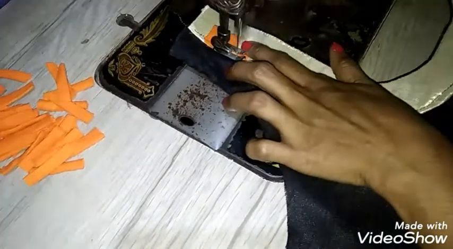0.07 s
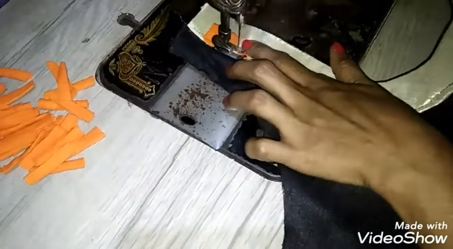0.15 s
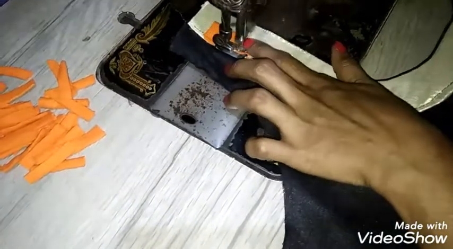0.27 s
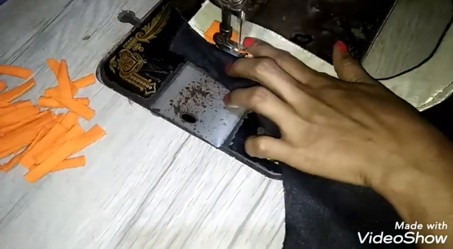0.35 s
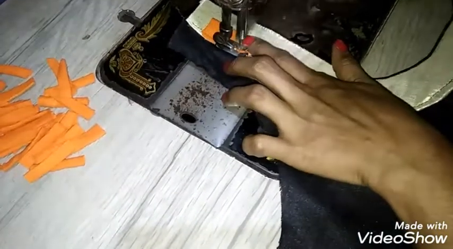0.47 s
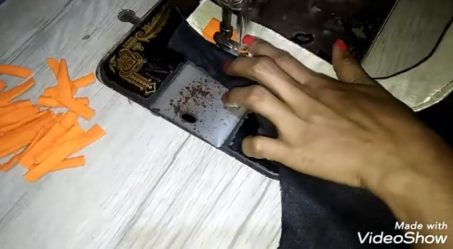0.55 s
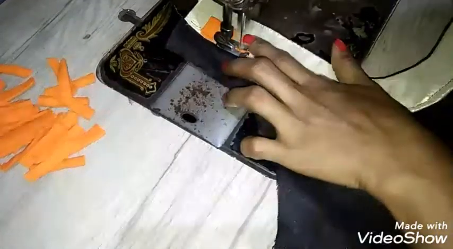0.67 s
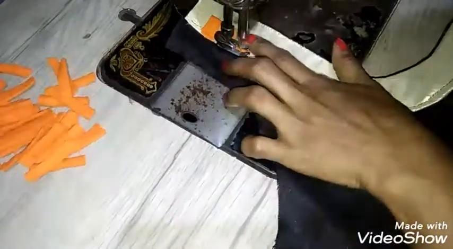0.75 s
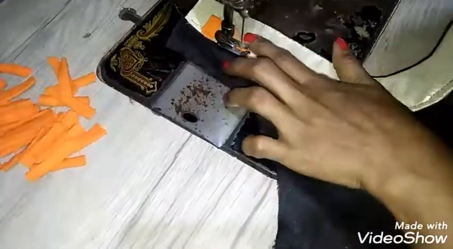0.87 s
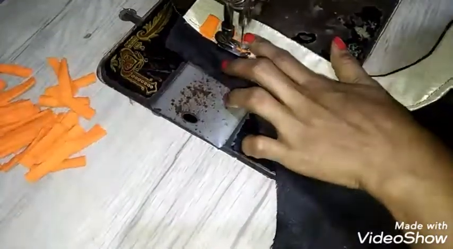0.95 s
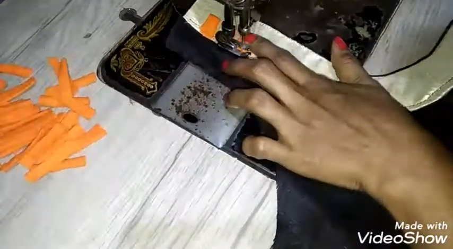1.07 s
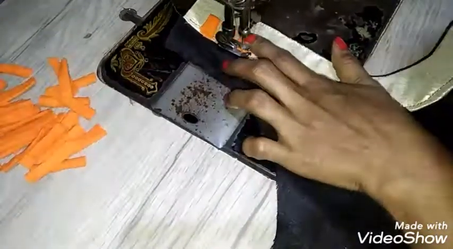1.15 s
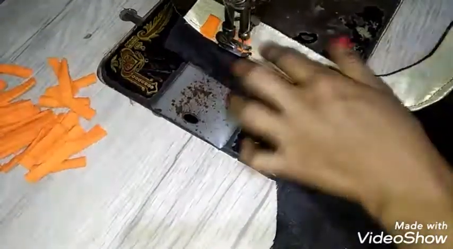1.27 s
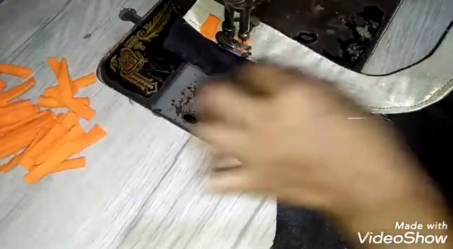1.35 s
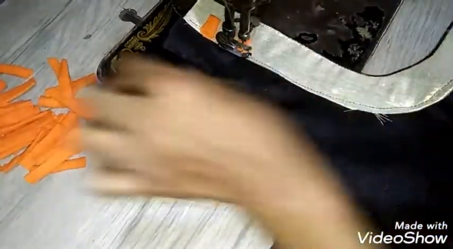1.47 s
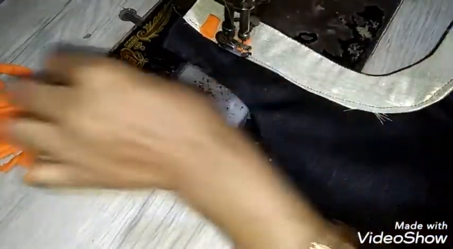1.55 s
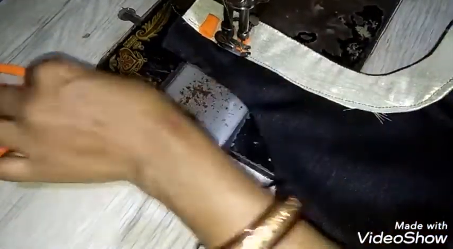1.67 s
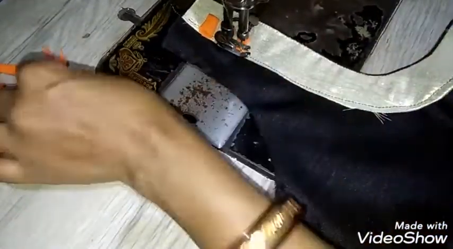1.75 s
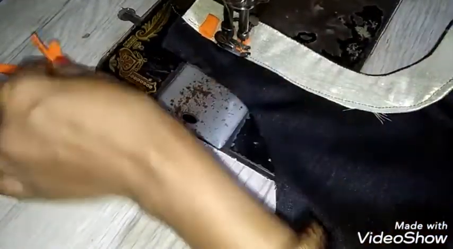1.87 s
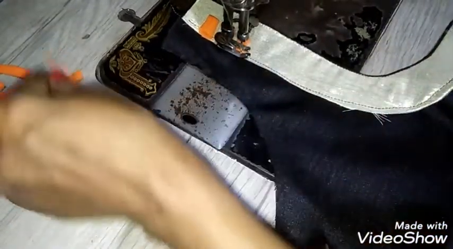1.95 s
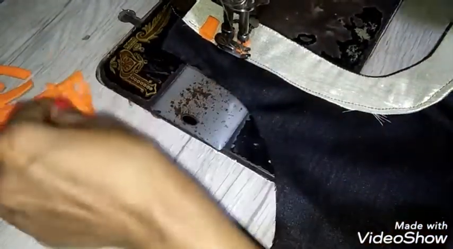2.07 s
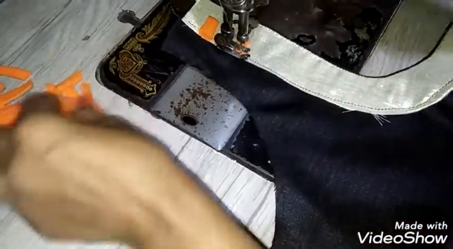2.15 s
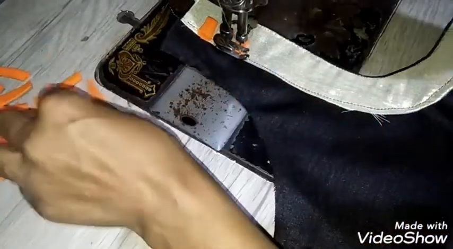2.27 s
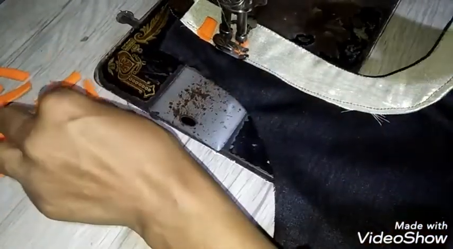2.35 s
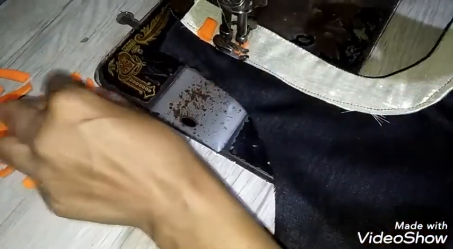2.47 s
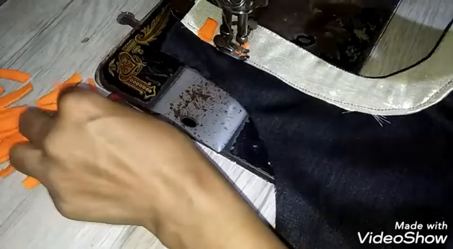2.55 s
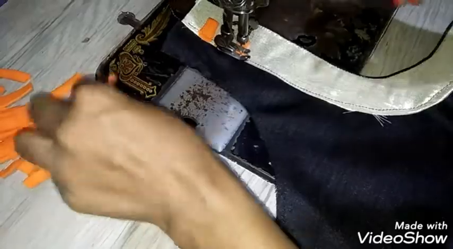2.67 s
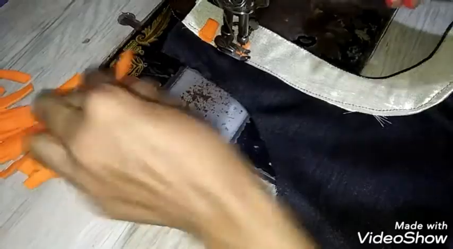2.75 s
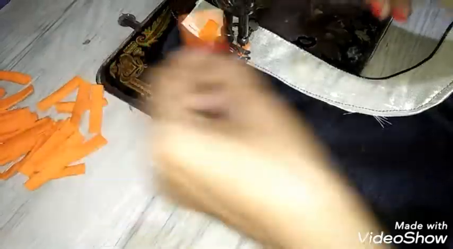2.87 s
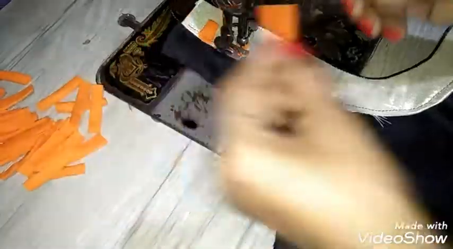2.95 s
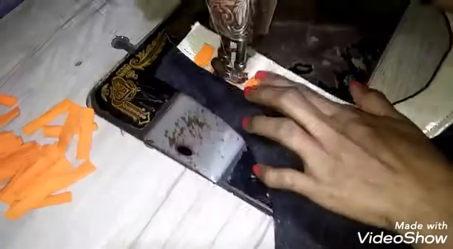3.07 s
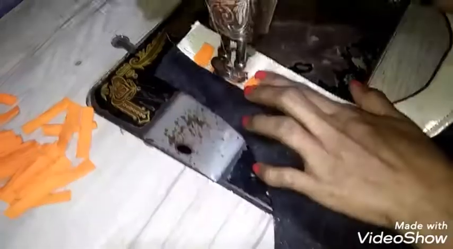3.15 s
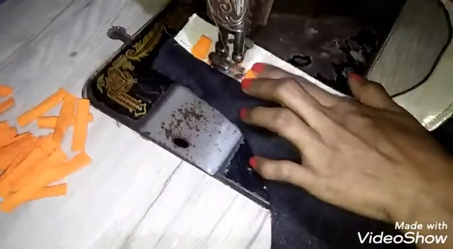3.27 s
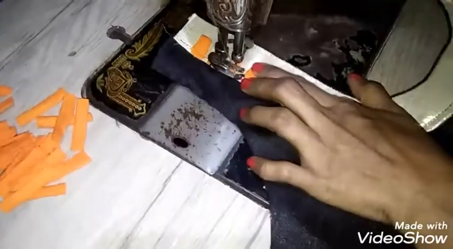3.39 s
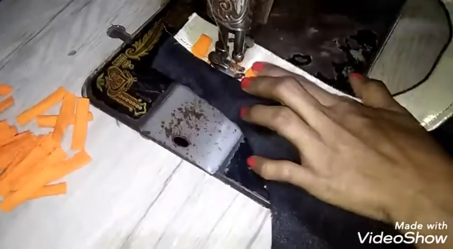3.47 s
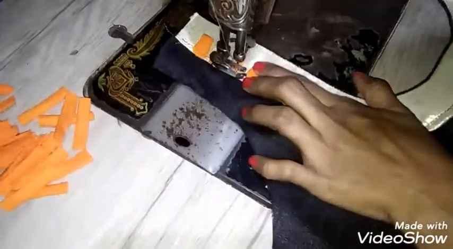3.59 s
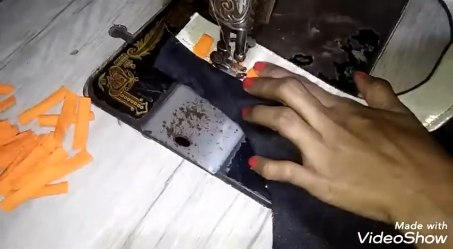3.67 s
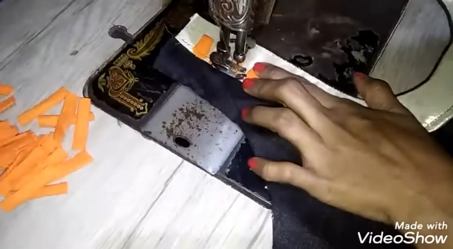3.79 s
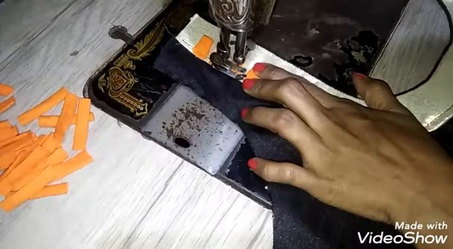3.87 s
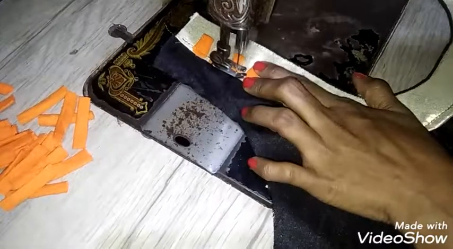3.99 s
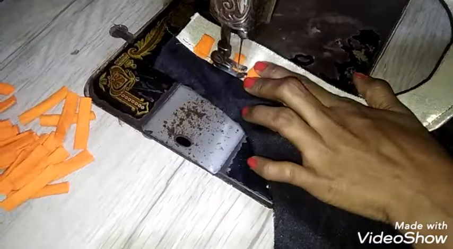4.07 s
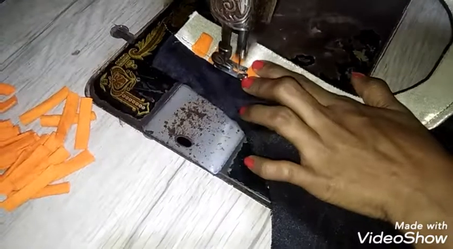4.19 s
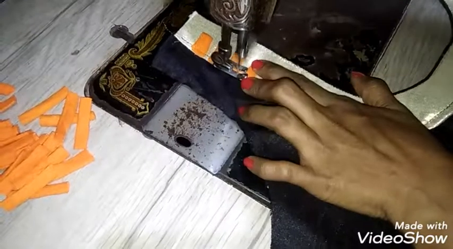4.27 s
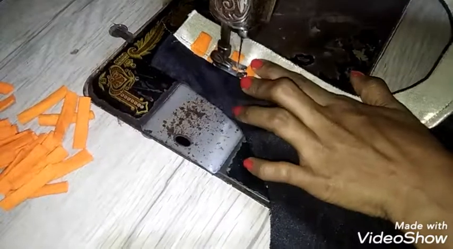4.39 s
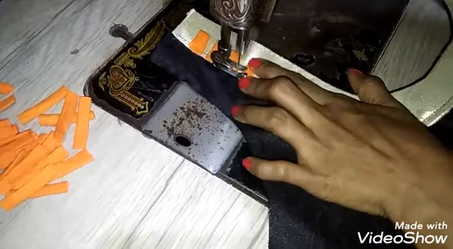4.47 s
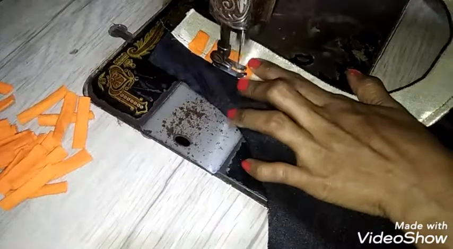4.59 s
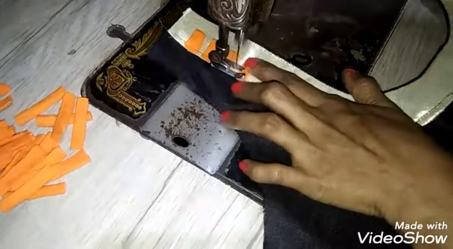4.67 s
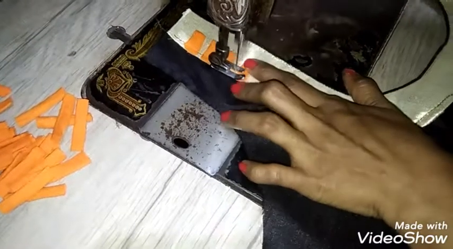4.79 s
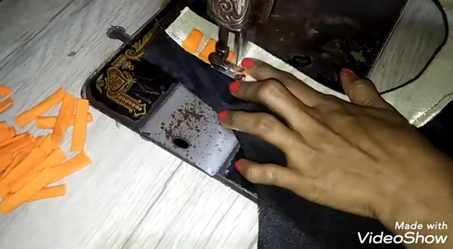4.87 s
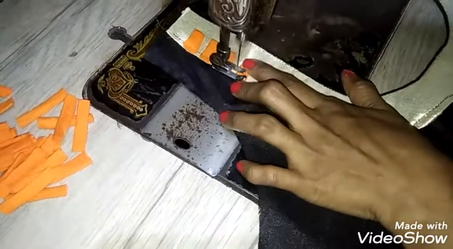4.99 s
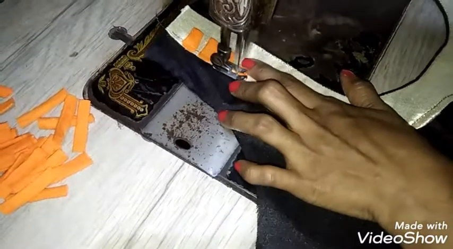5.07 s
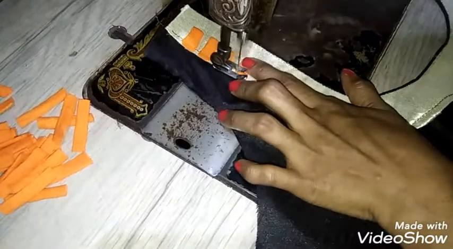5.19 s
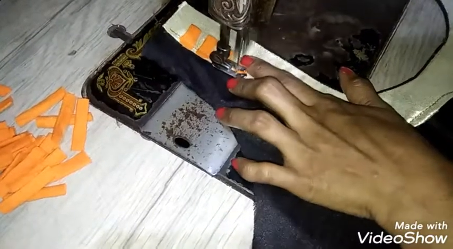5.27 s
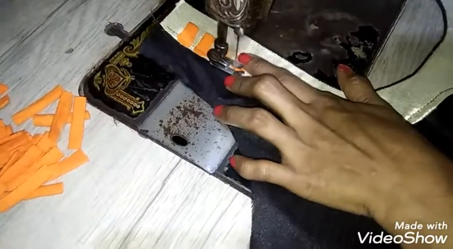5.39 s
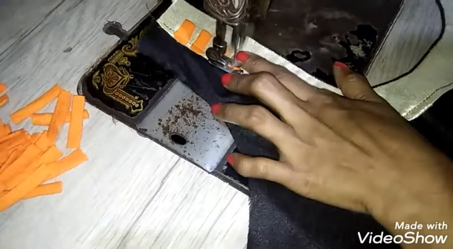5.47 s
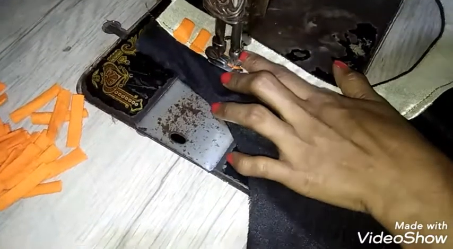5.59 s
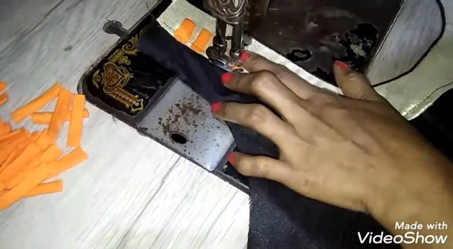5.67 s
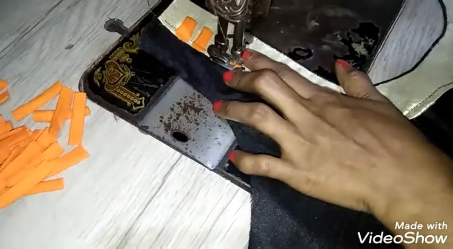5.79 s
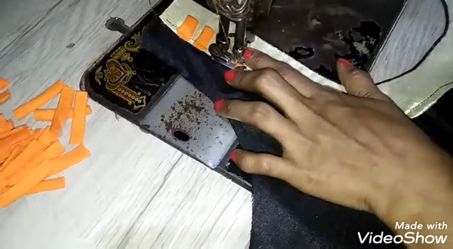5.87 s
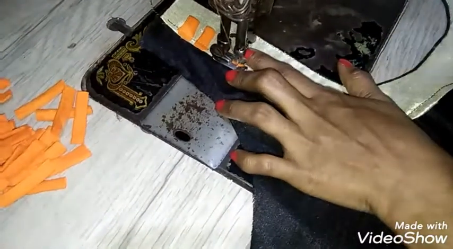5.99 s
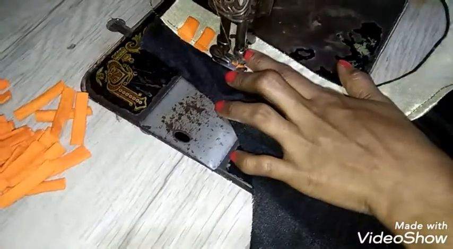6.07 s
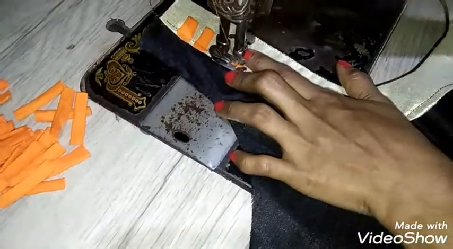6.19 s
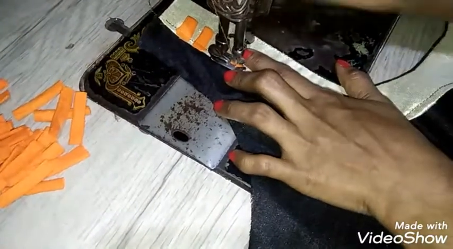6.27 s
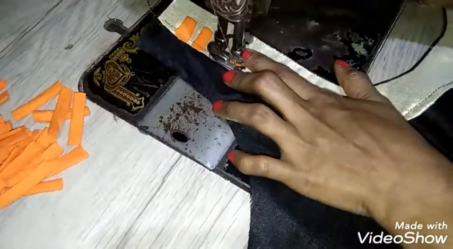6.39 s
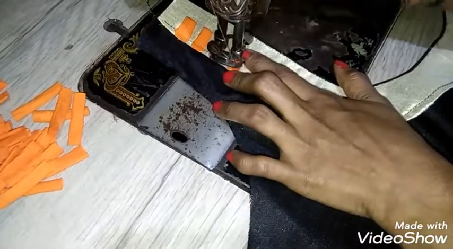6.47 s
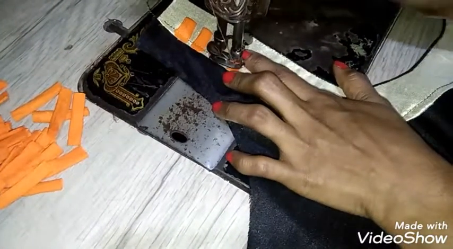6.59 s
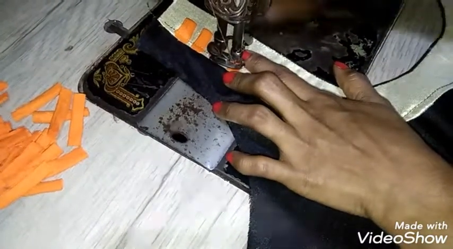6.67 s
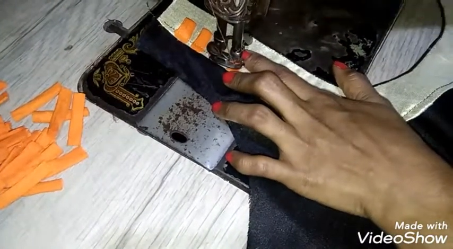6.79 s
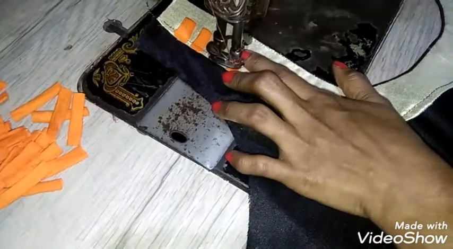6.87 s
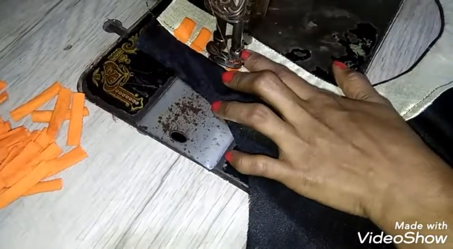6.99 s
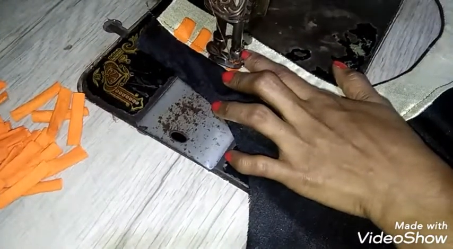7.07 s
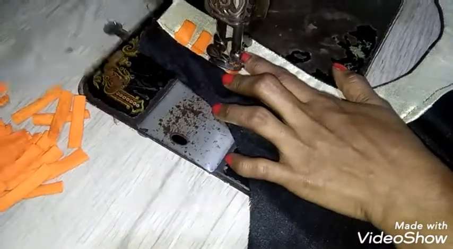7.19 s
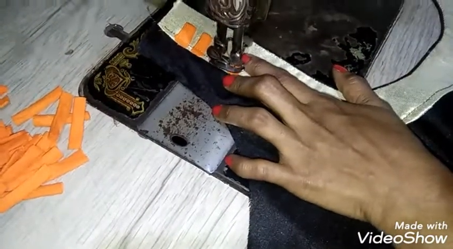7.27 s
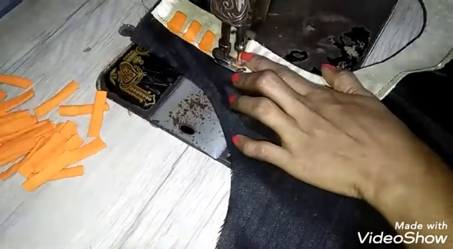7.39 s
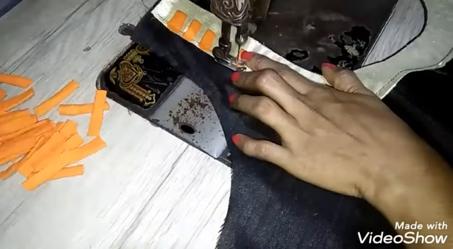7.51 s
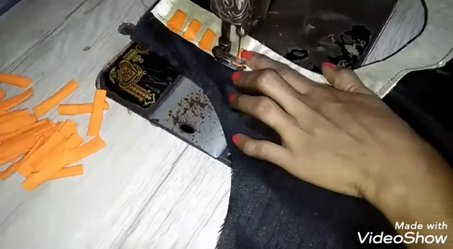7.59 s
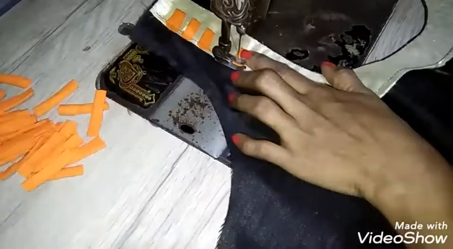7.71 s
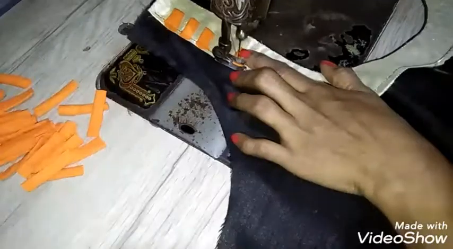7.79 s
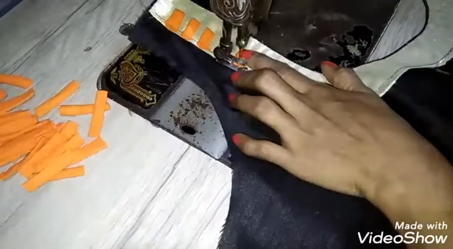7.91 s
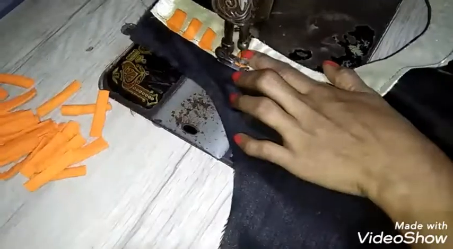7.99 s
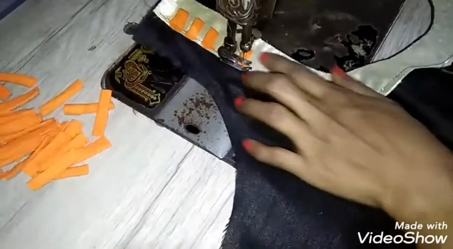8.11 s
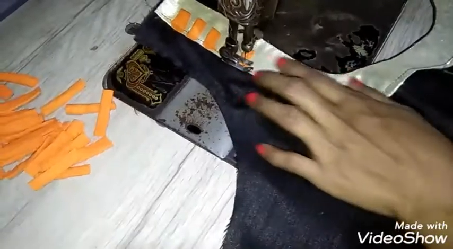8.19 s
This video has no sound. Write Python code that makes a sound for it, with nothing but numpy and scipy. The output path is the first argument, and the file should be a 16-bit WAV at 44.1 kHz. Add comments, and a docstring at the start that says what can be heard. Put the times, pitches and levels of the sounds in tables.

```python
"""An old iron sewing machine on a wooden table stitches cloth in short runs, heard close and nearly mono.
Each stitch is a tick of the linkage, a sharp clack of the needle bar and a rattling shuttle swing, with snaps between.
These are bursts of tiny random contacts that ring the iron's resonances; bearings and cloth are shaped noise.
Between the runs the presser foot clicks, cloth is shifted and the table thuds and rumbles.
Swinging tones make the thuds, gliding tones the faint squeaks, and soft noise the quiet room."""
import sys
import numpy as np
from scipy import signal
from scipy.fft import rfft, irfft, next_fast_len
from scipy.io import wavfile
from scipy.ndimage import uniform_filter1d, map_coordinates

SR = 44100
rng = np.random.default_rng(int(sys.argv[2]) if len(sys.argv) > 2 else 0)


def persist_wave(psi):
    """Save psi, clipped to +-1, as 16-bit WAV."""
    counts = np.round(np.clip(psi, -1, 1) * 32767).astype(np.int16)
    wavfile.write(sys.argv[1], SR, np.atleast_2d(counts).T)


N = 363379  # length in samples

# Levels in the tables are settings; the functions add their own trims in dB.
# One row per stitch: clack_s, length_of_turn_before_s, linkage_lead_s, clack_level_db,
# clack_treble_db (relative), linkage_level_db, shuttle_level_db, table_level_db
STITCHES = [(0.1379, 0.15, 0.025, -27, -13, -38.5, -53, -55),
            (0.3557, .21, 0.03, -25, -13, -35.5, -32, -46), (0.573, 0.22, 0.029, -36.5, -20, -37, -34, -47),
            (0.8118, 0.24, 0.028, -32, -17.5, -37.5, -35, -77),
            (1.078, 0.27, 0.048, -40.5, -11, -41, -37, -58),
            (4.314, 0.23, 0.0086, -33.5, -17, -41, -61, -50),
            (4.6168, 0.3, 0.025, -27.5, -5, -34.5, -31.5, -38.5),
            (4.8531, 0.2, .027, -25.5, -7, -34, -33.5, -43),
            (5.0424, .188, 0.027, -23.5, -3, -36, -32, -49.5),
            (5.2397, .195, 0.031, -26, -2.5, -35, -31, -38),
            (5.434, 0.19, 0.034, -27, -2.5, -35, -31, -39.5),
            (5.6274, 0.19, 0.026, -28, -2.5, -37.5, -32.5, -58),
            (7.9745, 0.3, 0.019, -34, -13, -53, -37.5, -68)]
# The wheel turns: start_s, stop_s, sliding_parts_db, loose_parts_db, fed_cloth_db,
# loose_parts_treble_db (relative), dry_scraping_db
RUNS = [(0, 1.112, -51.5, -52.5, -57, -27, -74), (4.127, 4.355, -47, -44.5, -54, -19, -65),
        (4.426, 5.668, -48.5, -44.5, -53.5, -13.5, -65), (7.834, 7.994, -52.5, -47, -74, -21, -61.5),
        (8.008, 8.171, -62.5, -61, -71, -20, -73.5)]
# The mechanism takes up its play as the wheel is nudged or changes speed: peak_s, level_db, body_db (relative)
JOLTS = [(0.586, -30.5, -6), (0.826, -30.5, 1), (0.926, -35, -14), (1.089, -32.5, -5.5), (4.138, -33.5, 2),
         (4.259, -29, 0), (4.488, -29, -11.5), (7.416, -47, 5), (7.441, -50.5, -4), (7.68, -50, 4.5),
         (7.806, -40.5, 8), (7.862, -39.5, -2), (7.994, -38, -21), (8.13, -45, -2)]
# Resonances of the bed and the steel parts: pitch_hz, width_hz, lift_db
IRON_MODES = [(164, 81, 15), (378, 11, -11.5), (429, 76, 9), (598, 67, 12), (741, 22, 6.5), (885, 28, 6.5),
              (1000, 31, 1.5), (1706, 160, -7), (2075, 29, 8.5), (2206, 55, 10), (2190, 45, -5),
              (2574, 100, 7), (2980, 60, 2.5), (3080, 62, 2.5), (3400, 60, -1.5), (3980, 51, 6.5),
              (6240, 400, -6)]
# What the needle bar adds to them: pitch_hz, width_hz, lift_db
BAR_MODES = [(2800, 80, 3.5), (3000, 100, 7), (3123, 130, 6.5), (6790, 150, 8), (7190, 700, 9.5),
             (8700, 300, 5.5), (13000, 250, 1.5), (13720, 200, 3), (14220, 150, 13)]
# What the shuttle adds to them: pitch_hz, width_hz, lift_db
SHUTTLE_MODES = [(1385, 70, 13), (2008, 40, 3), (2750, 120, -5.5), (3190, 120, 5.5)]
# Colour of the needle bar's clack: pitch_hz, level_db
CLACK_TONE = [(100, -12), (250, -21.5), (550, -3), (1000, -0.5), (1600, 1), (2900, 4.5), (4000, -4.5),
              (5800, -5.5), (7400, -9.5), (9500, -20), (11000, -17), (13500, -16.5), (15000, -36)]
# Colour of the linkage and the loose parts: pitch_hz, level_db
TICK_TONE = [(100, -23.5), (250, -19), (550, -5), (1000, -1), (1600, -1), (2500, -2.5), (4000, -16.5),
             (6000, -21.5), (8000, -23), (11500, -39.5), (14000, -31)]
# Colour of the shuttle swing: pitch_hz, level_db
SWING_TONE = [(100, -18.5), (250, -11.5), (550, -2), (1000, 4), (1600, 1.5), (2300, -1.5), (3200, -14),
              (4500, -36), (6500, -31), (9000, -36), (14000, -50)]
# Share of a turn by which the shuttle swing and the feed tick lead the clack
SHUTTLE_TURNS, FEED_TURNS = 0.585, 0.42
FEED_DB = -16  # feed tick relative to the linkage
CLACK_T60_S = 0.031  # time for the clack's first blow to fall by 60 dB
REBOUND_S, REBOUND_DB = 0.006, -7.5  # the needle bar lands a second time, this much later and weaker
LEAD_S = 0.06  # a rattle starts this long before its peak
SWING_RISE_S, SWING_FALL_S = 0.0055, 0.0081  # the shuttle's rattle builds up and settles
USUAL_TURN_S, BODY_DB_PER_S = 0.22, -46.5  # a slower turn shakes the frame less
FRAME_RING_DB = 1.42  # depth of the frame's many narrow modes, the same at every stitch
# A rattle is a cluster of tiny hits: their rate, their decay time, the steady rubbing between them
CONTACTS_PER_S, CONTACT_S, RUBBING = 330, 0.00096, 0.3
RATTLES_PER_S, RATTLE_DB = 40, 13.5  # loose parts: how often, and how far the weakest lie below the strongest
STROKE_DB, STROKE_TURNS = 2, 0.021  # swell on each up and down stroke, this far after the clack
SPIN_UP_S, COAST_S = 0.00047, 0.029  # rise and fall time constants of a run

# Dull knocks on the bed: peak_s, level_db
KNOCKS = [(0.6, -33), (4.192, -29.5), (4.207, -34.5), (4.489, -27), (5.154, -32), (5.659, -34.5),
          (8.073, -43)]
# Colour of the knocks: pitch_hz, level_db
KNOCK_TONE = [(120, -25.5), (280, -14.5), (450, -12), (620, -0.5), (800, -6.5), (1300, -8), (2500, -21),
              (6000, -55.5)]
# Colour of the sliding bearings: pitch_hz, level_db
RUN_TONE = [(100, -1.5), (250, -16.5), (600, -4), (1000, -14.5), (1600, -2), (2500, 4), (3600, -14.5),
            (8000, -28.5), (14000, -38)]
# Colour of the dry scraping: pitch_hz, level_db
SCRAPE_TONE = [(2000, -20), (3300, 1.5), (5200, -2), (11000, -27)]

# The hands fetch a strip of trim and lay it in place: time_s, cloth_db, table_rumble_db
FETCHING = [(1.25, -64.5, -75), (1.55, -68.5, -74), (1.7, -66, -83), (2.1, -64, -74), (2.71, -61.5, -75.5),
            (2.82, -61.5, -66.5), (3.14, -63.5, -68), (3.27, -61.5, -62), (3.44, -58, -68.5),
            (3.64, -62, -65), (3.82, -65, -71), (4.08, -60, -71.5)]
# The fingers settle on the cloth: time_s, cloth_db, table_rumble_db
SETTLING = [(5.851, -66, -82.5), (6.05, -72.5, -88.5), (6.3, -66, -87), (6.481, -63, -70)]
# The work is turned under the foot: time_s, cloth_db, table_rumble_db
TURNING = [(6.8, -64.5, -88), (6.891, -69.5, -89), (7.104, -67.5, -96.5), (7.352, -64.5, -85),
           (7.501, -63, -77.5), (7.64, -67.5, -78), (7.739, -59.5, -67), (8.2, -63, -87)]
# Single brushes of the fingers over cloth: peak_s, half_length_s, level_db
BRUSHES = [(2.272, 0.035, -60.5), (2.616, 0.055, -62.5), (3.252, 0.016, -55.5), (7.117, 0.023, -63),
           (7.2, 0.058, -63)]
# Colour of the cloth: pitch_hz, level_db
CLOTH_TONE = [(120, -32), (210, -20.5), (305, 0.5), (375, -7), (600, 0), (820, 0), (1050, -6.5),
              (1750, -8.5), (2600, -22), (4000, -66)]
# Colour of the table rumble: pitch_hz, level_db
RUMBLE_TONE = [(25, -17.5), (50, -7), (72, -2), (100, -11.5), (130, -21), (190, -12), (400, -66)]
RUB_DB, RUMBLE_DB = -1, 6  # gains of the hand-moved cloth and of the table rumble

# Colour of the room's air: pitch_hz, level_db
ROOM_TONE = [(25, -5.5), (60, -4.5), (135, -14.5), (290, -13), (400, -25), (600, -6.5), (830, -1),
             (1800, -9.5), (3600, -34), (14000, -34.5)]

# Crisp ticks of the feed and the thread guides: start_s, level_db
TICKS = [(0.04, -46), (0.097, -33.5), (0.109, -35), (0.177, -41), (0.217, -47), (0.288, -45), (0.542, -41),
         (0.736, -39), (0.858, -45), (0.954, -46), (1.025, -45), (1.042, -41), (4.19, -56), (4.526, -37),
         (4.569, -33.5), (4.784, -43.5), (4.928, -36.5), (4.984, -39), (5.209, -31), (7.415, -42.5),
         (7.786, -46), (7.841, -34.5), (7.901, -38), (7.931, -43), (7.956, -54)]
# Colour of these ticks: pitch_hz, level_db
SNAP_TONE = [(100, -18.5), (600, -9), (1200, -1.5), (1700, 3), (3000, -4.5), (4000, -6), (5300, -11.5),
             (8000, -14.5), (14000, -31.5)]

# Other thuds of the table: start_s, level_db, pitch_hz
THUDS = [(0.664, -44.5, 151.5), (2.959, -39.5, 76), (3.459, -36, 160.5), (3.6, -45, 73),
         (4.186, -43.5, 171), (4.927, -42, 160.3), (6.606, -37, 155), (7.72, -49, 71.7), (8.195, -48, 70.5)]
TABLE_HZ, TABLE_LAG_S = 154, 0.03  # pitch of the table top; it answers this long after the clack

# Faint high ticks while the hands move: peak_s, level_db
TINKS = [(1.539, -75.5)]
# Colour of these faint ticks: pitch_hz, level_db
TINK_TONE = [(2000, -38), (5000, 6), (10000, 24), (14000, 1)]

# Presser foot and its lever: start_s, level_db, body_db (relative), treble_db (relative), ring_t60_s
FOOT = [(3.5134, -47, 9.5, -4, 0.057), (3.5192, -30, -10.5, 0, 0.11), (6.5353, -28, -11, 9, 0.035),
        (6.5502, -27.5, -3.5, 5, 0.081), (6.568, -35, -2, 4.5, 0.098), (6.611, -37, 8.5, -25.5, 0.043),
        (6.6299, -37, 8, -27, 0.026), (6.7038, -52, 18, -22.5, 0.022)]
# Colour of the foot: pitch_hz, level_db
FOOT_TONE = [(40, -28), (160, -8.5), (950, -13), (1190, -1.5), (1550, -7), (2300, -4.5), (3200, -9),
             (4200, -23), (6000, -17.5), (9000, -22), (12000, -36), (13800, -27)]
# The lever's own ring: pitch_hz, width_hz, lift_db
LEVER_MODES = [(1210, 260, 12)]
# Modes of the foot's spring: pitch_hz, level_db, ring_t60_s
SPRING_MODES = [(1190, -53, 0.18), (2420, -50, 0.076), (9380, -37.5, 0.086), (14050, -59, 0.049)]
SPRING_S = 3.522  # when the spring is struck
FOOT_RISE_S = 0.0001  # rise time at 0 dB treble; a duller contact rises more slowly

# Thin, faint squeaks: start_s, stop_s, pitch_hz, glide_hz_per_s, level_db, waver (share of the pitch)
SQUEAKS = [(3.76, 4.1, 2240, 200, -72, .04), (8.012, 8.05, 3315, 40, -64, 0.008),
           (8.097, 8.16, 3318, 0, -63.5, .008)]

# Level of the side signal, which makes the width: pitch_hz, side_db
WIDTH = [(2500, -36), (5000, -17.5), (7500, -14), (10000, -8), (13000, -14)]
HISS_DB = -94.5  # microphone hiss that differs between the channels
TOP_HZ = 14600  # upper band limit


def amp(db):
    """Decibels to gain."""
    return 10 ** (np.asarray(db) / 20)


def unit(x):
    """Scale to an rms level of 1."""
    return x / np.sqrt(np.mean(x ** 2) + 1e-20)


def along(points, hz):
    """Read a curve of (Hz, value) points on a log frequency axis."""
    f, v = np.transpose(points)
    return np.interp(np.log(hz + 1), np.log(f + 1), v)


def curves(rows):
    """One value per sample for each column after the time."""
    s, *cols = np.transpose(rows)
    return [np.interp(np.arange(N) / SR, s, c) for c in cols]


def during(start, stop):
    """A gate that rises at start and dies away after stop."""
    t = np.arange(N) / SR
    rise = 1 - np.exp(-np.maximum(t - start, 0) / SPIN_UP_S)
    fall = np.exp(-np.maximum(t - stop, 0) / COAST_S)
    return rise * fall


def wobble(rate):
    """A smooth random curve with this many random points a second."""
    knots = rng.standard_normal(int(N * rate / SR) + 4)
    return map_coordinates(knots, [np.arange(N) * rate / SR])


def filtered(x, response):
    """Shape a sound by a response given as a function of frequency."""
    size = next_fast_len(N + SR // 2)
    return irfft(rfft(x, size) * response(np.fft.rfftfreq(size, 1 / SR)), size)[..., :N]


def noise(colour_db):
    """Noise of rms 1 with a colour given in dB as a function of frequency."""
    return unit(filtered(rng.standard_normal(N), lambda hz: amp(colour_db(hz))))


def patchy(x, depth_db):
    """Different bands of a noise come and go."""
    z = signal.stft(x, nperseg=1024)[2]
    field = uniform_filter1d(rng.standard_normal(z.shape), size=5, axis=0)
    field = uniform_filter1d(field, size=7, axis=1)
    return unit(signal.istft(z * amp(depth_db * unit(field)), nperseg=1024)[1][:N])


def causal(gain):
    """The response with this gain that rings only after the blow."""
    cepstrum = irfft(np.log(np.maximum(gain, 1e-6)))
    half = len(cepstrum) // 2
    # fold the backward half onto the forward half: minimum phase
    cepstrum[1:half] *= 2
    cepstrum[half + 1:] = 0
    return np.exp(rfft(cepstrum))


def add(track, s, sound):
    """Mix a sound in at s seconds."""
    start = max(round(s * SR), 0)
    track[start:start + len(sound)] += sound[:max(N - start, 0)]


def event_time(size=16384):
    """The time axis of one event."""
    return np.arange(size) / SR


def event_hz():
    """The frequency axis of one event."""
    return np.fft.rfftfreq(len(event_time()), 1 / SR)


def lift_db(modes, hz):
    """The lift that a set of resonances gives each frequency."""
    return sum(db / (1 + (2 * (hz - centre) / width) ** 2) for centre, width, db in modes)


def iron_db(hz, bass_hz=95):
    """The machine's resonances; so small a body radiates little bass."""
    bass_loss_db = 10 * np.log10(1 + (bass_hz / (hz + 1)) ** 4)
    return lift_db(IRON_MODES, hz) - bass_loss_db


def fine_modes(hz, spacing_hz):
    """Uneven random strengths of the many close modes of a metal part."""
    knots = rng.standard_normal(int(hz[-1] / spacing_hz) + 4)
    return map_coordinates(knots, [hz / spacing_hz])


def chatter(envelope, spiky_db, size=24):
    """Tiny metal contacts of uneven strength under an envelope."""
    strength = rng.standard_normal(len(envelope) // size + 1)
    strength = np.repeat(strength, size)[:len(envelope)]
    return rng.standard_normal(len(envelope)) * amp(spiky_db * strength) * envelope


def cluster():
    """A force of rms 1: tiny hits in quick, uneven succession, with rubbing between them."""
    t = event_time()
    place, strength = rng.random((2, 256))
    hits = np.zeros(len(t))
    at = ((np.arange(len(place)) + place) / CONTACTS_PER_S * SR).astype(int)
    inside = at < len(t)
    hits[at[inside]] = (0.5 + strength)[inside]
    decaying = signal.lfilter([1], [1, -np.exp(-1 / (CONTACT_S * SR))], hits)
    return unit(RUBBING + decaying)


def strike(t60, tail_db, tail_t60):
    """A sudden blow that dies fast, over a weaker, longer shake of the frame."""
    t = event_time()
    blow = amp(-60 * t / max(t60, 0.005))
    tail = amp(tail_db - 60 * t / tail_t60)
    return (1 - np.exp(-t / 0.00019)) * (blow + tail)


def swell(rise, fall, tail_db, tail_t60):
    """Loose parts rattle up to a peak near LEAD_S and settle, with a weaker tail."""
    t = event_time() - LEAD_S
    u = t / np.maximum(np.where(t < 0, rise, fall), 0.001)
    tail = (t > 0) * amp(tail_db - 60 * np.abs(t) / tail_t60)
    return np.exp(1 - np.hypot(1, u)) + tail


def contact(envelope, colour_db, db, body_db, treble_db, spiky_db, uneven_db,
            treble_damping=1.39, body_damping=0.64):
    """One shake of a part with its own mix of modes: the body rings on, the treble dies first."""
    hz = event_hz()
    low = 1 / (1 + (hz / 1500) ** 8)
    high = 1 - 1 / (1 + (hz / 6000) ** 8)
    bands = (low, np.abs(1 - low - high), high)
    colour = amp(colour_db + uneven_db * fine_modes(hz, spacing_hz=108.6))
    force = chatter(np.ones(len(envelope)), spiky_db)
    sound = 0
    for band, damping, share_db in zip(bands, (body_damping, 1, treble_damping), (body_db, 0, treble_db)):
        ring = irfft(rfft(force * envelope ** damping) * causal(colour * band))
        sound = sound + amp(share_db) * unit(ring)
    return amp(db) * np.sqrt(np.mean(envelope ** 2)) * sound


def strokes():
    """A gain that swells twice in each turn of the wheel, counted from the nearest clack."""
    t = np.arange(N) / SR
    clack, turn = np.transpose(STITCHES)[:2]
    nearest = np.searchsorted((clack[1:] + clack[:-1]) / 2, t)
    turns = (t - clack[nearest]) / turn[nearest]
    return amp(STROKE_DB * np.cos(2 * np.pi * 2 * (turns - STROKE_TURNS)))


def brightness_db(s):
    """The treble of the loose parts at time s; it differs from run to run."""
    start, stop, *_, treble_db, _ = np.transpose(RUNS)
    return np.interp(s, (start + stop) / 2, treble_db)


def stitches():
    """Each turn: shuttle swing, feed tick, linkage tick, needle clack; these and the loose parts ring the iron."""
    hz, out = event_hz(), np.zeros(N)
    frame = iron_db(hz) + FRAME_RING_DB * fine_modes(hz, spacing_hz=30.04)
    linkage = frame + along(TICK_TONE, hz)
    needle_bar = frame + along(CLACK_TONE, hz) + lift_db(BAR_MODES, hz)
    shuttle = frame + along(SWING_TONE, hz) + lift_db(SHUTTLE_MODES, hz)

    tick = swell(rise=0.003, fall=0.0045, tail_db=-15, tail_t60=0.13)
    rattle = swell(rise=SWING_RISE_S, fall=SWING_FALL_S, tail_db=-17.5, tail_t60=0.073)
    scrape = swell(rise=0.0036, fall=0.0018, tail_db=-33.5, tail_t60=0.05)
    landing = strike(CLACK_T60_S, tail_db=-10.5, tail_t60=0.13)
    rebound = np.interp(event_time() - REBOUND_S, event_time(), landing, left=0)
    blow = np.hypot(landing, amp(REBOUND_DB) * rebound)

    for s, turn, link_s, clack_db, bright_db, link_db, swing_db, _ in STITCHES:
        shake_db = BODY_DB_PER_S * (turn - USUAL_TURN_S)
        swing = contact(rattle * cluster(), shuttle, swing_db - 6, body_db=-2.5, treble_db=-37,
                        spiky_db=0.5, uneven_db=2.5)
        add(out, s - SHUTTLE_TURNS * turn - LEAD_S, swing)
        feed = contact(tick, linkage, link_db + FEED_DB - 6, body_db=-11, treble_db=bright_db - 3.5,
                       spiky_db=4, uneven_db=1)
        add(out, s - FEED_TURNS * turn - LEAD_S, feed)
        link = contact(tick * cluster(), linkage, link_db - 5.5, body_db=2.5 + shake_db,
                       treble_db=bright_db - 8, spiky_db=4.5, uneven_db=5)
        add(out, s - link_s - LEAD_S, link)
        # the bar scrapes in its guide around its landing
        guide = contact(scrape, needle_bar, clack_db - 21.5, body_db=-14, treble_db=bright_db,
                        spiky_db=-5, uneven_db=-4.5)
        add(out, s - LEAD_S, guide)
        clack = contact(blow, needle_bar, clack_db - 5, body_db=-4 + shake_db, treble_db=bright_db,
                        spiky_db=5, uneven_db=2.5)
        add(out, s, clack)

    jolt = swell(rise=0.0046, fall=0.0083, tail_db=-28, tail_t60=0.36)
    for s, db, body_db in JOLTS:
        jerk = contact(jolt * cluster(), linkage, db - 12, body_db, treble_db=brightness_db(s) - 1.5,
                       spiky_db=6, uneven_db=2.5)
        add(out, s - LEAD_S, jerk)

    stroke = strokes()
    for start, stop, _, db, _, treble_db, _ in RUNS:
        count = int(RATTLES_PER_S * (stop - start))
        for k, (place, weakness) in enumerate(rng.random((count, 2))):
            s = start + (stop - start) * (k + place) / count
            loose = contact(tick, linkage, db - RATTLE_DB * weakness, body_db=-6.5, treble_db=treble_db,
                            spiky_db=8, uneven_db=5)
            add(out, s - LEAD_S, stroke[min(int(s * SR), N - 1)] * loose)
    return out


def drive():
    """Dull knocks ring the bed; bearings rasp and dry slides scrape, swelling twice a turn while the wheel runs."""
    hz, knocks = event_hz(), np.zeros(N)
    bed = causal(amp(along(KNOCK_TONE, hz) + iron_db(hz)))
    envelope = swell(rise=0.0042, fall=0.01, tail_db=-29.5, tail_t60=0.15)
    for s, db in KNOCKS:
        ring = unit(irfft(rfft(chatter(envelope, spiky_db=2)) * bed))
        add(knocks, s - LEAD_S, amp(db - 5.5) * np.sqrt(np.mean(envelope ** 2)) * ring)

    effort = sum(amp(db) * during(start, stop) for start, stop, db, *_ in RUNS)
    grit = chatter(amp(3 * wobble(70)), spiky_db=3)
    rasp = unit(filtered(grit, lambda hz: amp(along(RUN_TONE, hz) + iron_db(hz))))

    dryness = sum(amp(db) * during(start, stop) for start, stop, *_, db in RUNS)
    grains = chatter(amp(3.5 * wobble(110)), spiky_db=3)
    scraping = unit(filtered(grains, lambda hz: amp(along(SCRAPE_TONE, hz) + iron_db(hz))))
    return knocks + strokes() * (amp(-8) * effort * rasp + dryness * scraping)


def hands():
    """Cloth rubs over the bed, moved by hand or by the feed, and the table rumbles under the arms."""
    cloth_db, arms_db = curves(np.vstack([FETCHING, SETTLING, TURNING]))
    cloth = noise(lambda hz: along(CLOTH_TONE, hz) + 0.5 * iron_db(hz))
    cloth = patchy(cloth, depth_db=2.6)
    t = np.arange(N) / SR
    brushed = sum(amp(db) ** 2 * np.exp(-((t - s) / length) ** 2) for s, length, db in BRUSHES)
    moved = np.sqrt(amp(cloth_db) ** 2 + brushed)
    fed = strokes() * sum(amp(db) * during(start, stop) for start, stop, _, _, db, *_ in RUNS)
    flutter = amp(0.74 * wobble(22) + 1.8 * wobble(130))
    rub = np.hypot(amp(RUB_DB) * moved, fed) * flutter * cloth
    lean = amp(3 * wobble(16))
    rumble = amp(arms_db + RUMBLE_DB) * lean * noise(lambda hz: along(RUMBLE_TONE, hz))
    return rub + rumble


def room():
    """The quiet air of the room is soft coloured noise, never quite even."""
    air = noise(lambda hz: along(ROOM_TONE, hz) + 0.5 * iron_db(hz))
    return amp(-69) * patchy(air, depth_db=3)


def ticks():
    """Small steel parts snap over their play: short and bright."""
    hz, out = event_hz(), np.zeros(N)
    steel = iron_db(hz) + along(SNAP_TONE, hz)
    snap = strike(t60=0.024, tail_db=-19, tail_t60=0.082)
    for s, db in TICKS:
        sound = contact(snap, steel, db - 6, body_db=1, treble_db=brightness_db(s) - 8.5,
                        spiky_db=1, uneven_db=6.5)
        add(out, s, sound)
    return out


def table():
    """Each stitch, and now and then a soft push, sets the wooden top swinging and dying away."""
    t, thuds = event_time(), np.zeros(N)
    envelope = (1 - np.exp(-t / 0.0075)) * amp(-60 * t / 0.13)
    answers = [(s + TABLE_LAG_S, db, TABLE_HZ) for s, *_, db in STITCHES]
    for s, db, hz in answers + list(THUDS):
        add(thuds, s, amp(db + 2) * envelope * np.sin(2 * np.pi * hz * t))
    return thuds


def tinks():
    """A touch of something light and hard gives a tiny, bright tick."""
    out, colour_db = np.zeros(N), along(TINK_TONE, event_hz())
    touch = swell(rise=0.002, fall=0.005, tail_db=-20, tail_t60=0.08)
    for s, db in TINKS:
        sound = contact(touch, colour_db, db - 7.5, body_db=-20, treble_db=14.5, spiky_db=12, uneven_db=6)
        add(out, s - LEAD_S, sound)
    return out


def presser_foot():
    """The foot snaps and its lever chatters as sharp blows on ringing metal; the spring rings once in pure tones."""
    t, clicks = event_time(), np.zeros(N)
    lever = along(FOOT_TONE, event_hz()) + lift_db(LEVER_MODES, event_hz())
    for s, db, body_db, treble_db, t60 in FOOT:
        rise = 1 - np.exp(-t / (FOOT_RISE_S * amp(-treble_db)))
        blow = strike(t60, tail_db=-25.5, tail_t60=0.3) * rise
        click = contact(blow, lever, db - 11, body_db + 7.5, treble_db - 12.5,
                        spiky_db=-1, uneven_db=3.5, body_damping=0.85)
        add(clicks, s, click)
    for hz, db, t60 in SPRING_MODES:
        add(clicks, SPRING_S, amp(db - 60 * t / t60) * np.sin(2 * np.pi * hz * t))
    return clicks


def squeaks():
    """Faint, wavering tones, some creeping up in pitch; the lowest is the roughest."""
    t, out = np.arange(N) / SR, np.zeros(N)
    for start, stop, hz, glide, db, waver in SQUEAKS:
        pitch = (hz + glide * (t - start)) * (1 + waver * wobble(300))
        flutter = amp(2.5 * wobble(60))
        tone = np.sin(2 * np.pi * np.cumsum(pitch) / SR)
        out += during(start, stop) * amp(db) * flutter * tone
    return out


def scene():
    """Everything sits in the middle; reflections widen the treble a little."""
    machine = stitches() + drive() + ticks() + presser_foot() + squeaks()
    mid = machine + hands() + room() + table() + tinks()
    t = event_time(size=4096)
    # the reflections begin after 3 ms
    walls = rng.standard_normal(len(t)) * amp(-60 * t / 0.093) * (t > 0.003)
    scattered = signal.fftconvolve(mid, walls / np.linalg.norm(walls))[:N]
    hiss = amp(HISS_DB) * rng.standard_normal(N)
    side = filtered(scattered, lambda hz: amp(along(WIDTH, hz))) + hiss
    return np.array([mid + side, mid - side])


def record(dry):
    """Cut the sound very steeply above the band limit."""
    return filtered(dry, lambda hz: 1 / np.sqrt(1 + (hz / TOP_HZ) ** 140))


dry = scene()
out = record(dry)
persist_wave(out)
```